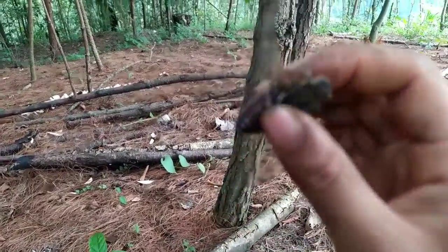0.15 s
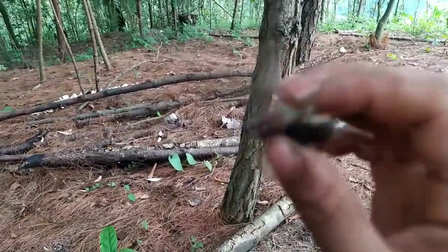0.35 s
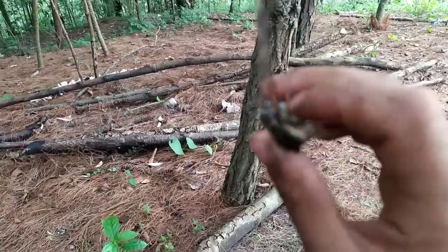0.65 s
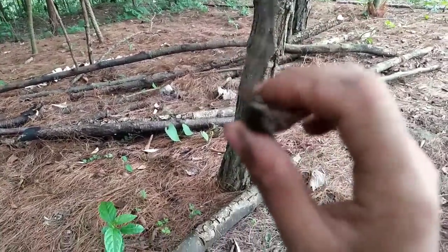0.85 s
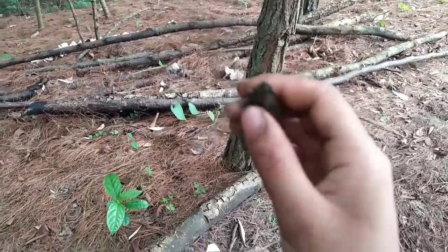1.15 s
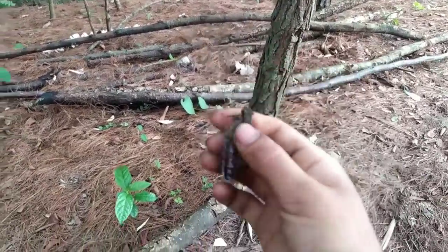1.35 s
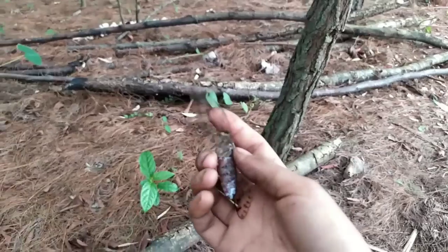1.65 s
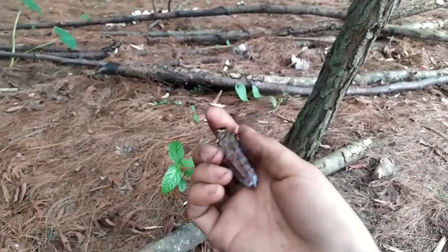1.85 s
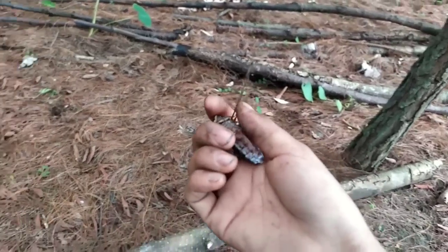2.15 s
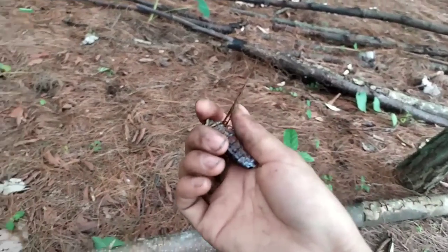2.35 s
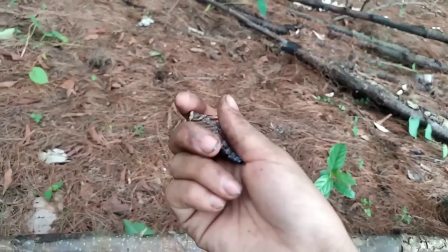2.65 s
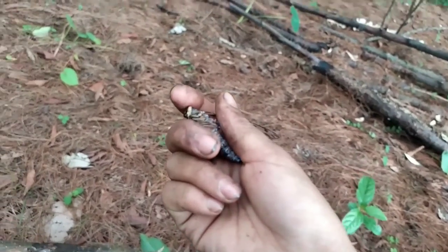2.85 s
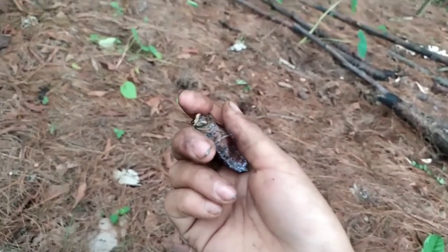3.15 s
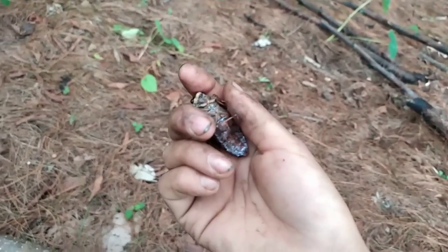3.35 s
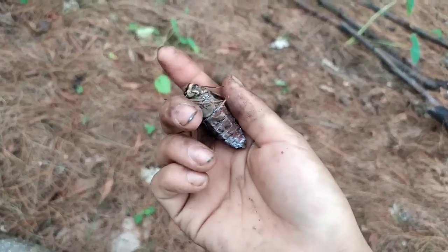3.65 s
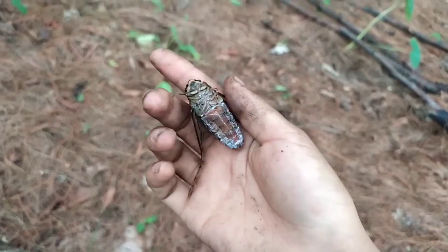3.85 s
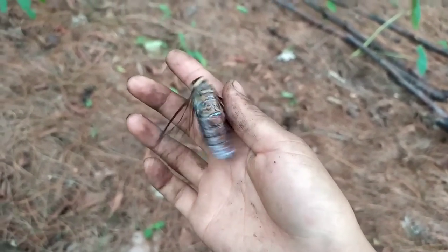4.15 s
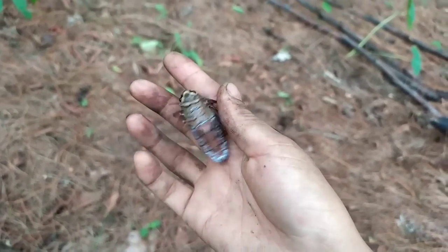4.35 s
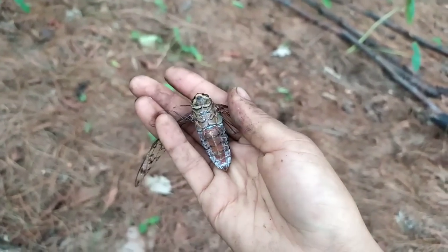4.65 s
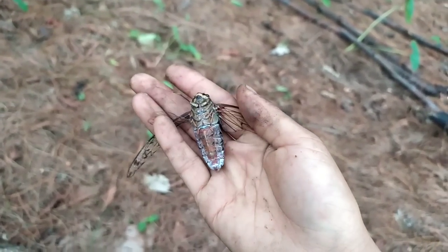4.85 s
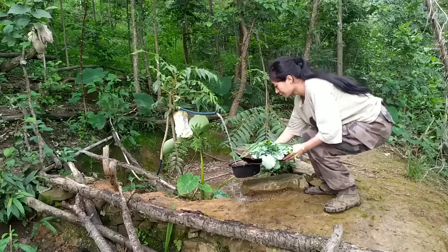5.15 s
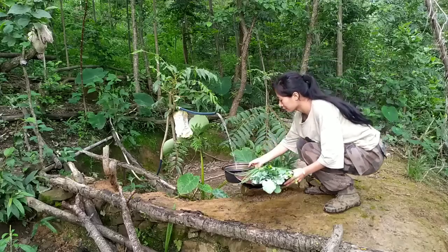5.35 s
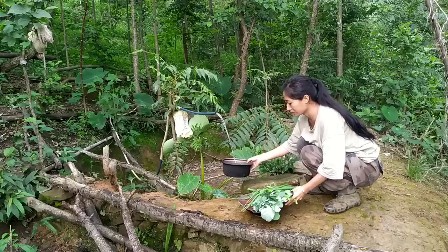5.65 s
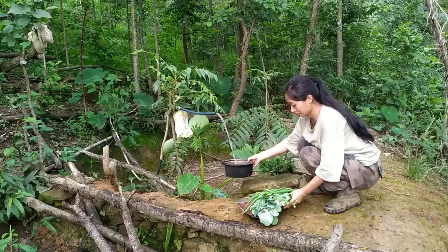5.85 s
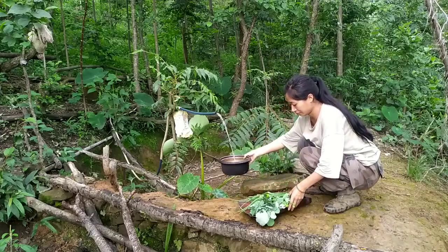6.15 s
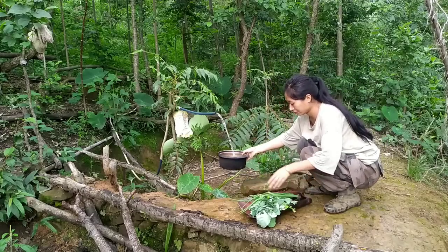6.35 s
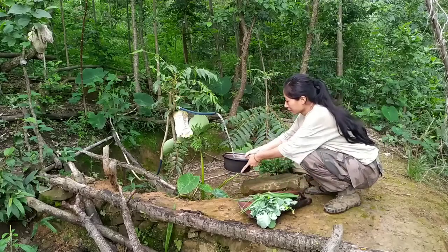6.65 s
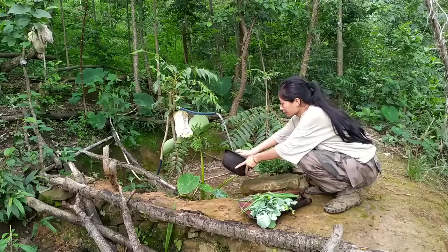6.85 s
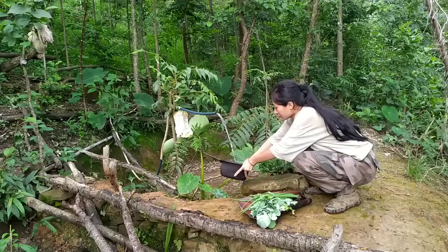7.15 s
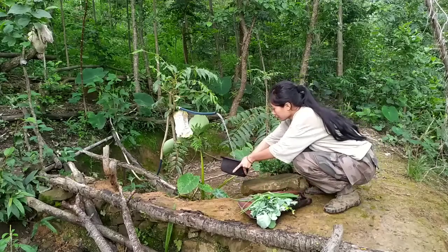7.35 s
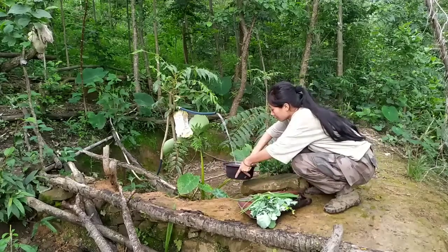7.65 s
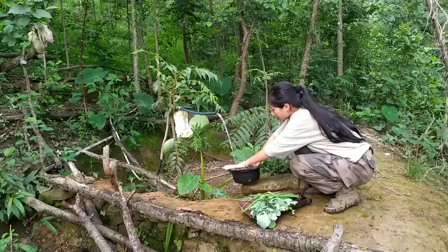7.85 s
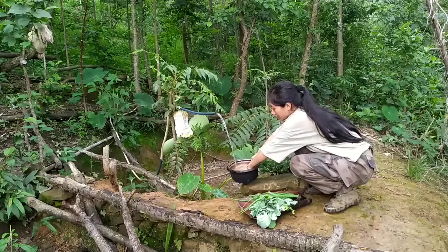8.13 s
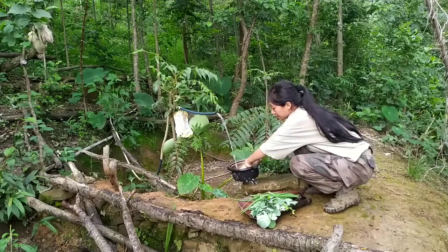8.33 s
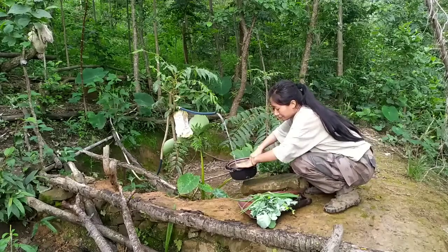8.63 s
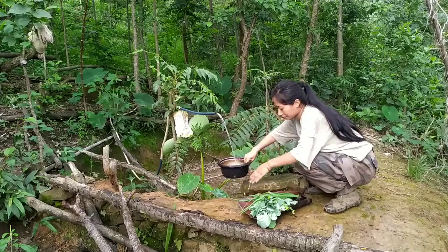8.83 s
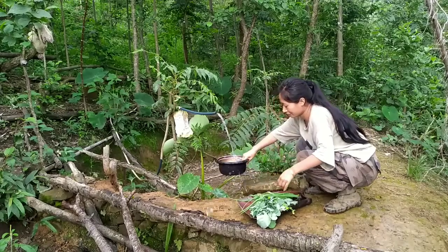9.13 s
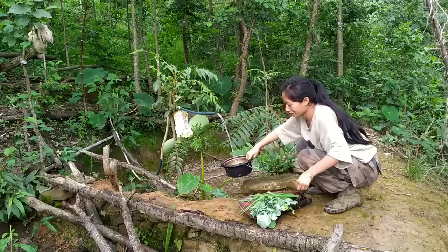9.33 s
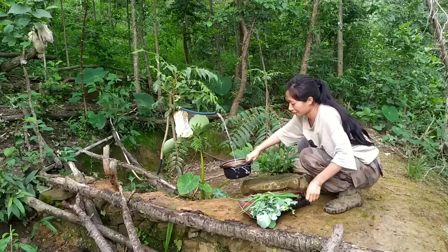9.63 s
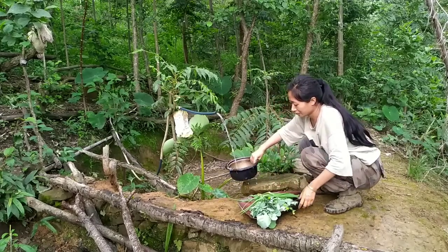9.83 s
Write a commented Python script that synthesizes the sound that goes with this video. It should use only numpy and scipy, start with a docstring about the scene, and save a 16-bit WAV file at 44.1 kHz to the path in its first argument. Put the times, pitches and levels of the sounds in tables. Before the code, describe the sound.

Very close to the microphone, a cicada held in fingers buzzes harshly, its rapid rattle swelling into piercing, ringing screams, faltering and changing tone as the grip shifts, with low wind bumps. A sudden cut brings a much quieter forest spring: thin water hiss, faint far cicadas, hollow metal pot knocks and small splashes as it is rinsed.

```python
"""Fingers close to a two-port microphone, then a forest spring: a held cicada screams while wind bumps the ports.
Its tymbals beat about 110 times a second: snaps, rib clicks and a ringing hollow abdomen share these beats.
In the screams the right port is overloaded: a dull thud and a sizzle near three times the ring's pitch.
At the spring, ribbed hiss makes distant cicadas; filtered noise, drops and bubbles make a thin stream;
noise bursts and dying sines make a metal pot being knocked and rinsed."""
import sys
import numpy as np
from scipy import signal
from scipy.fft import rfft, irfft
from scipy.io import wavfile
from scipy.ndimage import uniform_filter1d

SR = 44100
rng = np.random.default_rng(int(sys.argv[2]) if len(sys.argv) > 2 else 0)


def persist_wave(psi):
    """Save psi, clipped to +-1, as 16-bit WAV."""
    counts = np.round(np.clip(psi, -1, 1) * 32767).astype(np.int16)
    wavfile.write(sys.argv[1], SR, np.atleast_2d(counts).T)


N = 440559
T = np.arange(N) / SR
CUT_S = 5.345  # cicada before, spring after
EDGE_HZ = 15800  # band limit of the microphone
PORT_LAG_SAMPLES = 5  # the right port is nearer

# Tables. "rel." levels are scaled again where used.
# tymbal muscle: contraction rate, rms wander
BEAT_HZ, BEAT_WANDER_HZ = 110.1, 0.515
# faltering beats: t/s, half-length/s, slowing/Hz, weakening/dB
FALTERS = [(0.148, 0.025, 4, 1), (0.371, 0.031, 3, 0), (0.861, 0.022, 2, -0.5), (1.552, 0.039, 6.5, -1),
           (1.8, 0.034, 9.5, 0.5), (1.987, 0.028, 9.5, 0), (2.48, 0.044, 14, 2), (2.535, 0.013, -0.5, 2),
           (2.743, .012, 10, 9), (2.955, 0.059, 6.5, -1.5), (4.23, 0.041, 3.5, -0.5), (4.697, 0.053, 6, 0),
           (5.163, 0.047, -1, 2.5), (5.337, 0.11, 4, 7.5)]
# second tymbal, between the beats of the first: t/s, strength/0-1
SECOND_TYMBAL = [(.775, 0), (.795, 0.76), (.835, 0.21), (2.73, 0.03), (2.77, 0.57), (2.98, 0.4),
                 (3.07, 0.6), (3.09, 0.9), (3.3, 1), (3.58, 0.91), (3.815, 0.9), (3.825, 0)]
# strain of the insect: t/s, effort/dB
EFFORT = [(0, -17), (.18, -8.5), (.24, -1), (.55, -4.5), (.8, 1.5), (.88, -9), (1.08, -7.5), (1.62, -4.5),
          (1.87, 3), (2.14, 2.5), (2.3, -1.5), (2.98, -2.5), (3.1, 2), (3.48, 6), (3.81, 2.5), (3.85, -0.5),
          (4.0, -4), (4.35, -5.5), (4.98, 2), (5.33, 2)]
EFFORT_WAVER_DB = 0.76  # rms
# part levels at zero effort/dB, and slopes/dB per dB of effort
RING_DB, RING_SLOPE = -9.5, 0.21
PLATE_DB, PLATE_SLOPE = -21.5, 0.16
RIBS_DB, RIBS_SLOPE = -27, 1.23
GLIDE_SLOPE, THUD_SLOPE = 0.14, 0.75
# spectrum of the plate snap: f/Hz, rel. level/dB
PLATE_SPECTRUM = [(600, -18.5), (880, -18), (1060, -8), (1250, 6.5), (1520, 10), (1900, 12), (2300, 9),
                  (2700, 12.5), (2950, 9.5), (3250, -4.5), (4000, -12), (6000, -49.5)]
# bare snap under a shut abdomen: t/s, lowest f/Hz, level/dB, hold/0-1
SWOOPS = [(0, 1200, -41, 0.22), (.19, 1230, -26.5, 0.35), (.23, 2020, -31, 0), (.45, 1700, -26.5, 0),
          (.76, 1670, -30, 0.01), (.82, 1340, -21.5, 0.4), (.9, 1410, -24, 0.4), (1.0, 1220, -24.5, 0.05),
          (1.12, 1980, -48, 0.22), (2.1, 1680, -26, 0.17), (2.32, 1650, -41, 0.16), (2.35, 1550, -29, 0),
          (2.52, 1480, -34, 0), (2.58, 1550, -40, .05), (2.7, 1680, -31, 0.18), (2.76, 1267, -27, 0.33),
          (3.06, 1206, -28.5, 0.3), (3.09, 1389, -20, 0.37), (3.27, 1266, -21, 0.26),
          (3.48, 1620, -22, 0.1), (3.52, 1340, -21, 0.45), (3.6, 1520, -25, 0), (3.85, 1540, -31, 0)]
# spectrum of the rib rattle: f/Hz, rel. level/dB
RIB_SPECTRUM = [(1500, -58), (2400, 11.5), (2950, 7), (3300, 5), (3600, 10.5), (4300, 8), (4950, -9),
                (5400, 2), (6100, -9.5), (8500, -23.5)]
# spectrum of the fizz: f/Hz, rel. level/dB
FIZZ_SPECTRUM = [(2500, -8.5), (4500, 12), (5400, 6), (6100, 8), (6600, 8), (7100, 5.5), (7600, 9),
                 (8100, 6.5), (9000, 4), (11000, 0.5), (12500, -2), (15500, -6)]
# fizzing treble: t/s, rel. level/dB
FIZZ_LEVEL = [(0, -35), (.25, -33), (.8, -33.5), (1.02, -37), (1.2, -35), (1.72, -33.5), (2.05, -35.5),
              (2.45, -38.5), (2.78, -36), (3.1, -40.5), (3.5, -36.5), (3.8, -31), (4.2, -32.5),
              (5.05, -33.5), (5.33, -34.5)]
# rib sizzles as the grip shifts: start/s, end/s, first f/Hz, last f/Hz, level/dB
SIZZLES = [(.22, .9, 8200, 8370, -38.5), (1.15, 1.95, 8200, 9970, -39)]
# wind gusts on the ports: t/s, half-length/s, level/dB
GUSTS = [(.1, 0.26, -38), (.52, 0.16, -34.5), (.95, 0.21, -42.5), (1.56, 0.086, -38), (1.78, 0.05, -42),
         (2.08, 0.24, -45.5), (2.58, 0.17, -32), (2.97, 0.13, -39), (3.37, 0.15, -43), (3.68, 0.071, -30.5),
         (4.07, 0.19, -30.5), (4.33, 0.082, -35.5), (5.14, 0.035, -34)]
CALM_DB = -54  # wind between gusts
# spectrum of wind, also of the air at the spring: f/Hz, rel. level/dB
WIND_SPECTRUM = [(15, -11), (32, -13), (55, 2.5), (80, -0.5), (120, -6.5), (180, -15), (300, -29),
                 (600, -39), (2000, -29.5)]
# gliding resonances above the abdomen's ring, a pinched tymbal at first, an open body mode in the last scream:
# start/s, end/s, first f/Hz, last f/Hz, rel. level/dB, second mode re first/dB
GLIDING_RESONANCES = [(0.197, .36, 2500, 2570, -23, -17), (0.367, 0.565, 2700, 2560, -31.5, -1),
                      (0.587, 0.686, 2760, 2780, -25, 1), (0.707, 0.812, 2760, 2746, -22, -7),
                      (1.004, 1.153, 2760, 2750, -31, -24), (2.688, 2.748, 2500, 3250, -21, -17),
                      (2.997, 3.085, 3225, 2900, -22, -16), (3.085, 3.225, 2570, 2690, -20, -26),
                      (3.228, 3.412, 2780, 2890, -28.5, -24), (3.405, 3.57, 2730, 2640, -17, -14),
                      (3.557, 3.82, 2730, 2760, -24, -20), (3.83, 4.497, 2900, 2990, -30.5, -19),
                      (4.52, 5.29, 2985, 2920, -29.5, -7)]
# screams of the opening abdomen: start/s, end/s, attack/s, release/s, opening/0-1, rel. overload level/dB
SCREAMS = [(0.203, 0.904, .01, 0.47, 0.34, -67), (1.013, 2.331, 0.11, 0.004, 0.78, -44.5),
           (2.35, 2.53, 0.002, 0.022, 0.22, -62), (2.562, 2.69, 0.0017, 0.075, 0.75, -55),
           (3.552, 5.39, 0.0066, 0.013, 0.67, -39)]
# snaps that fail to ring the abdomen fully: start/s, end/s, weakening/dB
MISFIRES = [(1.644, 1.662, 6), (1.671, 1.699, 5.5), (1.708, 1.735, 6.5), (1.783, 1.812, 5),
            (1.822, 1.831, 4), (5.108, 5.19, 2)]
# abdominal cavity as it stretches: t/s, f/Hz, ring length/s
CAVITY = [(0, 2270, .0008), (.25, 2360, 0.0013), (.55, 2027, 0.00093), (1.05, 2380, 0.00073),
          (1.2, 2280, 0.0024), (1.48, 2282, 0.0029), (1.7, 2232, 0.0014), (2.0, 2320, 0.0036),
          (2.2, 2210, 0.0016), (2.32, 2220, 0.00095), (2.35, 2170, 0.00068), (2.54, 2060, 0.00076),
          (2.575, 2310, 0.0028), (2.61, 2090, 0.0019), (2.635, 2300, 0.0034), (2.67, 2070, 0.0017),
          (3.45, 2360, 0.00089), (3.58, 2224, 0.0021), (4.08, 2285, 0.004), (4.55, 2192, 0.0025),
          (4.95, 2214, 0.0027), (5.33, 2180, 0.0034)]
RING_JITTER_S = .000018  # rms
UPPER_RATIO, UPPER_DB = 1.605, -30  # second mode: pitch and level re the cavity
# spectrum of the overload thud: f/Hz, rel. level/dB
THUD_SPECTRUM = [(50, -13.5), (110, 0.5), (220, 2), (330, 1.5), (450, -1.5), (900, 0), (1300, -0.5),
                 (2000, -53), (4000, -109)]
# stronger overload as the open hand turns to the port: t/s, half-length/s, rise/dB
FACING = [(3.706, 0.15, 2.5), (4.792, 0.44, 6.5)]
OVERTONE_DB = 3  # overload sizzle re overload gain
SHRILL_HZ, SHRILL_DB = 7580, -6  # fixed metallic body resonance, level re overload gain
# ribs rasping against the grip: t/s, half-length/s, f/Hz, rel. level/dB
RASPS = [(.4, .1, 4050, -33), (1.88, .04, 4100, -31), (2.13, .04, 4000, -27), (2.655, .02, 3950, -29),
         (3.13, .07, 3500, -27), (3.245, .012, 3200, -21), (3.3, .011, 3050, -15.5),
         (3.348, .016, 3100, -17.5), (3.475, .014, 2850, -16), (3.68, .1, 3600, -28),
         (4.62, .08, 3500, -30)]
RASP_FLOOR_HZ = 2170  # the small ribs radiate little lower
# legs and wings scuffing the fingers: t/s, half-length/s, f/Hz, level/dB
SCUFFS = [(0.817, 0.0071, 3000, -31), (.955, 0.016, 3600, -31.5), (2.75, 0.014, 4000, -29.5),
          (2.784, .025, 4320, -30.5), (5.306, 0.0016, 4850, -20)]
# far cicadas: t/s, rel. low level/dB, rel. high level/dB
CHORUS = [(5.4, -54, -47.5), (7.2, -51.5, -45.5), (8.3, -50, -43.5), (9.1, -49, -42.5), (9.6, -48.5, -46),
          (9.98, -50, -47)]
# spectrum of the low chorus: f/Hz, rel. level/dB
LOW_CHORUS_SPECTRUM = [(800, -39), (1060, -29), (1230, -10.5), (1380, -4.5), (1650, -4.5), (1840, -11.5),
                       (2000, 5), (2150, -15), (2450, 1), (2900, 0.5), (3150, -5), (3400, -5.5), (3600, -9),
                       (5000, -45)]
# spectrum of the high chorus: f/Hz, rel. level/dB
HIGH_CHORUS_SPECTRUM = [(2800, -40), (3550, -12), (3780, 5), (4000, 8.5), (4450, 1), (4800, 5.5), (5050, 2),
                        (5450, 7.5), (6000, 0.5), (6900, 1.5), (7600, -7.5), (10000, -27)]
# voices that stand out: f/Hz, rel. level/dB
SINGERS = [(1152, -72.5), (1384, -62.5), (1497, -72), (1610, -66), (1841, -65), (2080, -65.5),
           (2245, -68.5), (2315, -62), (2536, -59.5), (2762, -63), (4150, -69), (4253, -58), (4377, -59.5),
           (4470, -61), (5335, -64), (5626, -67.5), (5850, -64)]
# chirps in a slowing series, a rest, a restart: t/s, swell/dB
CHIRPS = [(7.775, 5.5), (7.9, 7), (8.025, 8), (8.17, 5), (8.3, 6.5), (8.46, 9.5), (8.61, 5.5), (8.77, 6.5),
          (8.91, 5.5), (9.075, 7), (9.855, 9), (9.98, 9)]
CHIRP_HALF_S = .035
# spectrum of the stream: f/Hz, rel. level/dB
STREAM_SPECTRUM = [(20, -3), (50, -4), (90, -7), (180, 5.5), (300, -4.5), (600, -3), (1000, -3), (2500, 14),
                   (3400, -13), (5000, 9), (7500, 2.5), (10000, 0), (13000, -8), (15500, -13)]
# stream flow: t/s, rel. level/dB
FLOW = [(5.4, -60.5), (6.9, -59.5), (8.3, -54.5), (9.3, -54.5), (9.98, -59)]
# water swirling in the pot: t/s, half-length/s, rel. level/dB
SLOSHES = [(7.12, 0.17, -62), (7.55, 0.23, -66), (8.2, .25, -68), (8.68, 0.12, -69), (9.55, 0.14, -79),
           (9.97, 0.16, -67)]
TRICKLE_DB = -75.5  # gurgle between swirls, rel.
# knocks and splashes: t/s, dull body rel. level/dB, bright splash rel. level/dB, pot ring rel. level/dB
KNOCKS = [(5.477, -40, -56, -48.5), (5.559, -31.5, -27, -46), (5.991, -41, -58, -56),
          (6.113, -25.5, -41, -57), (6.248, -35, -60, -63), (6.559, -48, -42, -78), (6.82, -45, -57, -68),
          (7.203, -37, -55, -70), (7.689, -37, -52, -61), (8.084, -34, -55, -70),
          (8.187, -29.5, -16.5, -64), (8.195, -44, -37, -72), (8.217, -52, -39, -75),
          (8.246, -37, -38, -74), (8.369, -26, -23, -65), (8.461, -32, -25.5, -70), (8.658, -39, -50, -72),
          (8.847, -38, -35, -72), (9.166, -42, -46, -59), (9.435, -39, -39, -72), (9.52, -40, -55, -72),
          (9.712, -39, -39, -77), (9.762, -60, -43, -70)]
# modes of the ringing pot: f/Hz, rel. level/dB, t60/s
POT_MODES = [(398, -3.5, 0.31), (910, -9, 0.53), (1500, -4, 0.22)]
# modes of the water-damped pot, retuned at each knock: nominal f/Hz, rel. level/dB, t60/s
KNOCK_MODES = [(512, -5.5, 0.061), (750, -10, 0.079), (1080, -3, 0.056), (1980, -22, 0.033)]
# spectrum of the dull body: f/Hz, rel. level/dB
BODY_SPECTRUM = [(80, -4), (200, -5.5), (400, -8), (700, -1), (1150, -6.5), (1800, 2.5), (3500, -39),
                 (8000, -33)]
# spectrum of the splash: f/Hz, rel. level/dB
SPLASH_SPECTRUM = [(600, -59), (1800, -8), (3500, 0.5), (5500, -6.5), (7600, 2.5), (9000, -0.5),
                   (11000, -8.5), (15500, -14)]


def amp(db):
    """Decibels to gain."""
    return 10 ** (np.asarray(db) / 20)


def evened(x):
    """Scales to rms 1."""
    return x / np.sqrt(np.mean(x ** 2) + 1e-20)


def curves(rows):
    """Columns of a table, joined by straight lines in time."""
    s, *columns = np.transpose(rows)
    return [np.interp(T, s, column) for column in columns]


def drift(hz, at=T, size=256):
    """Slow noise of rms 1 below hz, read at the given times."""
    grid = T[::size]
    spectrum = rfft(rng.standard_normal(len(grid)))
    passed = np.fft.rfftfreq(len(grid), size / SR) < hz
    return np.interp(at, grid, evened(irfft(spectrum * passed, len(grid))))


def colour(x, points, size=2048):
    """Causal minimum-phase filter with the given spectrum: steep edges ring on after a click."""
    hz, db = np.transpose(points)
    bins_hz = abs(np.fft.fftfreq(size, 1 / SR)) + 1
    log_gain = np.log(amp(np.interp(np.log(bins_hz), np.log(hz), db)))
    taps = np.fft.ifft(np.exp(np.conj(signal.hilbert(log_gain)))).real
    return signal.oaconvolve(np.atleast_2d(x), taps[None], axes=1)[:, :N]


def steady(x, size=1600):
    """Holds the rms of the ports' mean near 1 over a few pulses."""
    power = np.atleast_2d(x).mean(0) ** 2
    power = uniform_filter1d(uniform_filter1d(power, size), size)
    return x / np.sqrt(abs(power) + 1e-14)


def noise(same):
    """White noise at both ports, with a share of power in common."""
    same = np.clip(same, 0, 1)
    return np.sqrt(same) * rng.standard_normal(N) + np.sqrt(1 - same) * rng.standard_normal((2, N))


def clicks(times, sizes, order=8):
    """One windowed sinc at each exact time."""
    at = np.floor(times * SR).astype(int)[:, None] + np.arange(1 - order, order + 1)
    off = at - times[:, None] * SR
    shape = sizes[:, None] * np.sinc(off) * np.cos(np.pi * off / (2 * order)) ** 2
    return np.bincount(np.clip(at, 0, N - 1).ravel(), shape.ravel(), N)


def ports(right_db):
    """Left and right gains with mean 1, right_db apart."""
    gains = np.array([[1], [amp(right_db)]])
    return gains / gains.mean()


def flicker(x, depth_db, size=1024, count=9, order=4):
    """Spectral patches, count frames long and order bins wide, swell and fade on their own."""
    z = signal.stft(x, nperseg=size)[2]
    patches = uniform_filter1d(rng.standard_normal(z.shape[1:]), count, 1)
    patches = evened(uniform_filter1d(patches, order, 0))
    return signal.istft(z * amp(depth_db * patches), nperseg=size)[1][:, :N]


def band(x, hz, width_hz):
    """Steep resonance following the curve hz, held near rms 1: shifted to 0 Hz, smoothed, shifted back."""
    turn = np.exp(2j * np.pi * np.cumsum(hz) / SR)
    r = np.exp(-np.pi * width_hz / SR)
    smooth = signal.lfilter([(1 - r) ** 2], [1, -2 * r, r ** 2], x * turn.conj() + 1e-18)
    return steady((turn * smooth).real)


def bumps(times, half_lengths, heights, size=64):
    """A sum of bell-shaped swells."""
    grid = T[::size]
    bells = np.exp(-np.minimum(((grid[:, None] - times) / half_lengths) ** 2, 50))
    return np.interp(T, grid, bells @ heights)


def surges(rows, rest_db):
    """Gain of swells (t/s, half-length/s, level/dB) over a resting level, summed as power."""
    s, half_s, db = np.transpose(rows)
    return np.sqrt(bumps(s, half_s, amp(db) ** 2) + amp(rest_db) ** 2)


def gate(start, end, attack_s, release_s, size=16):
    """Exponential attack, hold and release, within 0 to 1."""
    grid = T[::size]
    attack = np.expm1(-np.maximum(grid - start, 0) / attack_s)
    release = np.expm1(-np.maximum(end - grid, 0) / release_s)
    return np.interp(T, grid, attack * release)


def across(starts, ends, first, last):
    """A value that runs from first to last during each event."""
    return np.interp(T, np.ravel([starts, ends], "F"), np.ravel([first, last], "F"))


def glides(rows, fade_s=0.0097):
    """Pitch and gain of gliding resonances."""
    gain = sum(amp(db) * gate(start, end, fade_s, fade_s) for start, end, _, _, db, *_ in rows)
    return across(*np.transpose(rows)[:4]), gain


def each_snap(times, size=600):
    """Sample places after each snap, and the time since it."""
    at = np.ceil(times * SR).astype(int)[:, None] + np.arange(size)
    return at, at / SR - times[:, None]


def cicada():
    """All tymbal-driven parts on one set of beats; one effort curve scales most of them."""
    times, sizes = tymbal_beats()
    effort_db = curves(EFFORT)[0] + EFFORT_WAVER_DB * drift(18)
    snaps = evened(clicks(times, sizes))
    ribs = evened(rib_clicks(times, sizes))
    burst = abs(signal.lfilter([1], [1, -np.exp(-1 / (0.0058 * SR))], snaps))
    scrape = evened(noise(0.11) * np.roll(burst, 30))
    # each port hears another side of the body
    sides = evened(np.array([rib_clicks(times, sizes), rib_clicks(times, sizes)]))
    crackle = .9 * ribs + sides + .4 * scrape

    opening, overload = screams(effort_db)
    cavity = steady(abdomen(times, sizes))
    body = plate_snap(snaps + .55 * ribs + .45 * scrape, effort_db)
    body = body + swoops(times, sizes) * ports(8.8)
    body = body + gliding_resonances(snaps, ribs, scrape, effort_db)
    body = body + abdomen_ring(cavity, snaps + 0.61 * ribs, opening, effort_db)
    body = body + overload_thud(snaps + 0.027 * scrape, overload)
    left, right = body + rasps(snaps + 0.65 * ribs + 0.72 * scrape)
    lagged = np.array([np.roll(left, PORT_LAG_SAMPLES), right])

    treble = rib_treble(crackle, scrape, effort_db) + shrill(crackle, overload)
    s, half_s, _, weaker_db = np.transpose(FALTERS)
    whole = lagged + treble + overload_sizzle(cavity, scrape, overload)
    return whole * amp(-bumps(s, half_s, weaker_db))


def tymbal_beats(uneven_db=1.2, jitter_s=.00002, stagger_s=0.00013):
    """Snap times and strengths; the two tymbals take turns, never quite evenly."""
    s, half_s, slower_hz, _ = np.transpose(FALTERS)
    rate_hz = BEAT_HZ - bumps(s, half_s, slower_hz) + BEAT_WANDER_HZ * drift(25)
    half_turns = 2 * np.cumsum(rate_hz) / SR
    k = np.arange(1, int(np.interp(CUT_S, T, half_turns)))
    late, strong = rng.standard_normal((2, len(k)))
    times = np.interp(k, half_turns, T) + jitter_s * late
    times = times + (k % 2) * stagger_s * drift(11.08, times)  # the second drifts off the half beat
    sizes = np.where(k % 2, np.interp(times, T, curves(SECOND_TYMBAL)[0]), 1)
    return times, sizes * amp(uneven_db * strong)


def rib_clicks(times, sizes, gap_s=.00052, fall_db=1.15, count=6):
    """Ribs buckle one after another behind each snap, alternating in sign; their spacing wanders."""
    out = np.zeros(N)
    for k in range(count):
        wander = .15 * drift(2.5, times) + .016 * rng.standard_normal(len(times))
        out += (-1) ** k * clicks(times + gap_s * (k + 1 + wander), sizes * amp(-fall_db * k))
    return out


def plate_snap(buckle, effort_db):
    """Buckling rings the tymbal plate's spectrum; a long bare swoop takes over from it."""
    bare = np.clip(curves(SWOOPS)[2], 0, 1)
    plate = steady(colour(buckle, PLATE_SPECTRUM)) * ports(8.8)
    return plate * (1 - bare) ** 2 * amp(PLATE_DB + PLATE_SLOPE * effort_db)


def swoops(times, sizes, above_hz=2000, drop_s=.0005, back_hz=1900, back_s=.0004,
           stroke_s=.0033, rise_s=.0003, fade_s=.0011, octave_db=-14):
    """The tymbal's tone falls as it buckles, rests low, and climbs as it springs back."""
    low_hz, db, hold = curves(SWOOPS)
    low_hz = np.interp(times, T, low_hz + 25 * drift(7.4))[:, None]
    hold = np.interp(times, T, hold)[:, None]
    at, age = each_snap(times)
    age = np.minimum(age, 1.3 * stroke_s)
    fall = -above_hz * drop_s * np.expm1(-age / drop_s)
    climb = back_hz * back_s * np.exp((age - stroke_s) / back_s)
    turns = low_hz * age + fall + climb
    shape = -np.expm1(-(age / rise_s) ** 2) * (np.exp(-age / fade_s) + hold)
    shape = shape * np.exp(-(age / stroke_s) ** 10)
    tone = np.sin(2 * np.pi * turns) + amp(octave_db) * np.sin(4 * np.pi * turns)
    return steady(np.bincount(at.ravel(), (sizes[:, None] * shape * tone).ravel(), N)) * amp(db)


def rib_treble(crackle, scrape, effort_db):
    """Rib clicks and scrape excite a rattle, gliding sizzles and a flickering fizz."""
    rattle = steady(colour(crackle, RIB_SPECTRUM)) * amp(RIBS_DB + RIBS_SLOPE * effort_db) * ports(1.36)
    fizz = steady(colour(crackle + 3.8 * scrape, FIZZ_SPECTRUM))
    fizz = fizz * amp(curves(FIZZ_LEVEL)[0] + 1.23) * ports(0.57)
    sizzle_hz, sizzle_gain = glides(SIZZLES)
    sizzle = band(crackle, sizzle_hz, 2000) * sizzle_gain
    return rattle + sizzle + flicker(fizz, 2.2)


def wind():
    """Turbulence at the ports: lumpy rumble, mostly unrelated between them."""
    rumble = colour(noise(0.2), WIND_SPECTRUM, size=8192) * amp(2.1 * drift(5.4))
    return evened(rumble) * surges(GUSTS, CALM_DB) * ports(-0.027)


def trees(x, t60=0.66, size=16000):
    """Sparse, decaying random echoes: scatter from the ground and the trunks."""
    sparse = rng.standard_normal((2, size)) * (rng.random((2, size)) < .05)
    tail = sparse * amp(-60 * T[:size] / t60)
    return signal.oaconvolve(x, tail / np.linalg.norm(tail[0]), axes=1)[:, :N]


def gliding_resonances(snaps, ribs, scrape, effort_db):
    """Two gliding modes above the abdomen's ring: a pinched tymbal at first, an open body mode in the last scream."""
    glide_hz, glide_gain = glides(GLIDING_RESONANCES)
    starts, ends, *_, mode_db = np.transpose(GLIDING_RESONANCES)
    first = band(snaps + 0.085 * ribs + 0.32 * scrape, glide_hz, 210) * ports(10.4)
    second = band(snaps + 0.39 * ribs + 2.3 * scrape, 1.55 * glide_hz, 410)
    second = second * amp(across(starts, ends, mode_db, mode_db))
    return (first + second) * glide_gain * amp(GLIDE_SLOPE * effort_db)


def screams(effort_db):
    """Abdomen opening and overload gain; misfires weaken the overload twice as much in dB."""
    *_, opening, thud_db = np.transpose(SCREAMS)
    gates = np.array([gate(*row[:4]) for row in SCREAMS])
    misfire = amp(-sum(db * gate(start, end, .001, .001) for start, end, db in MISFIRES))
    overload = (amp(thud_db) @ gates) * misfire ** 2
    overload = overload * amp(THUD_SLOPE * effort_db + bumps(*np.transpose(FACING)))
    return (opening @ gates) * misfire, overload


def abdomen(times, sizes, rise_s=0.001, damping=1.88, rebound=0.1, rebound_s=0.00515, rebound_width_s=0.00029):
    """Each snap swells in the air cavity and is damped; the tymbal's return gives a small second push."""
    times = times + RING_JITTER_S * rng.standard_normal(len(times))  # it catches early or late
    # the struggling insect flexes its abdomen: pitch and length wobble
    cavity_hz, ring_s = curves(CAVITY)
    hz = np.interp(times, T, cavity_hz + 20 * drift(22))[:, None]
    length_s = np.interp(times, T, ring_s * np.exp(.08 * drift(35)))[:, None]
    at, age = each_snap(times)
    shape = -np.expm1(-(age / rise_s) ** 2) * np.exp(-(age / length_s) ** damping)
    shape = shape / shape.max(1, keepdims=True)
    shape = shape + rebound * np.exp(-((age - rebound_s) / rebound_width_s) ** 2)
    turns = hz * age * (1 + 0.0076 * (1 - age / length_s / 2))  # the tone sags as the tymbal relaxes
    return np.bincount(at.ravel(), (sizes[:, None] * shape * np.sin(2 * np.pi * turns)).ravel(), N)


def abdomen_ring(cavity, drive, opening, effort_db):
    """The cavity and its second mode radiate as the abdomen opens."""
    upper = band(drive, UPPER_RATIO * curves(CAVITY)[0], 220) * amp(UPPER_DB)
    return (cavity + upper) * opening * amp(RING_DB + RING_SLOPE * effort_db) * ports(9.0)


def overload_thud(drive, overload):
    """Pulses overload the right port: a dull thud 40 samples behind each snap."""
    return steady(colour(np.roll(drive, 40), THUD_SPECTRUM)) * overload * ports(54)


def overload_sizzle(cavity, scrape, overload):
    """Cubing the ring distorts it into a sizzle near three times its pitch."""
    sizzle = band(cavity ** 3 * (1 + 0.29 * scrape), 2.87 * curves(CAVITY)[0], 990)
    return sizzle * overload * amp(OVERTONE_DB) * ports(31.0)


def shrill(crackle, overload):
    """A fixed metallic body resonance that follows the overload gain."""
    return band(crackle, np.full(N, SHRILL_HZ), 460) * overload * amp(SHRILL_DB)


def rasps(drive, width_hz=1200):
    """Ribs catch and grate for a few beats, in a broad band above the ring."""
    s, half_s, hz, db = np.transpose(RASPS)
    floor = signal.butter(4, RASP_FLOOR_HZ, "high", fs=SR, output="sos")
    grate = band(signal.sosfilt(floor, drive), np.interp(T, s, hz) + 70 * drift(25), width_hz)
    return grate * surges(np.transpose([s, half_s, db]), -90) * ports(10.5)


def scuffs(grains_per_s=1500, width_hz=2600):
    """Legs and wings scuff the fingers: short rubs of grainy noise in a resonance."""
    s, half_s, hz, db = np.transpose(SCUFFS)
    grit = noise(0.37) * (0.29 + 4 * (rng.random(N) < grains_per_s / SR))
    return band(grit, np.interp(T, s, hz), width_hz) * surges(np.transpose([s, half_s, db]), -90)


def chorus():
    """Far cicadas blur into two bands of ribbed hiss; narrow-band singers stand out, the high ones chirping."""
    low_db, high_db = curves(CHORUS)
    s, swell_db = np.transpose(CHIRPS)
    chirp_db = bumps(s, CHIRP_HALF_S, swell_db)
    low = evened(colour(noise(0.13), LOW_CHORUS_SPECTRUM)) * amp(low_db + 3.0)
    high = evened(colour(noise(0.011), HIGH_CHORUS_SPECTRUM)) * amp(high_db + 0.51 * chirp_db)
    hz = np.fft.rfftfreq(N, 1 / SR)
    power = sum(amp(db) ** 2 / (1 + ((hz - f) / 20) ** 2) ** 2 for f, db in SINGERS)
    voices = rfft(noise(0.15)) * np.sqrt(power)
    low_singers = evened(irfft(voices * (hz < 3300), N)) * amp(low_db + 5.0)
    high_singers = steady(irfft(voices * (hz > 3300), N)) * amp(high_db + chirp_db - 6.5)
    ribbed = flicker(low + high + low_singers + high_singers, 2.6, size=2048, count=44, order=3)
    return flicker(ribbed, 1.3)


def water(drops_per_s=260, bubbles_per_s=90, count=14):
    """A thin stream hisses and spatters; short rising bubbles blend to a gurgle as the pot is swirled."""
    drop_sizes = amp(4.2 * np.minimum(rng.exponential(1, (2, N)), 4))
    drops = (rng.random((2, N)) < drops_per_s / SR) * drop_sizes
    stream = evened(colour(noise(0.3) + 0.53 * evened(drops), STREAM_SPECTRUM))
    stream = stream * amp(curves(FLOW)[0] + 8.0)
    bubbles, t = np.zeros(N), T[:1500]
    for hz in np.geomspace(480, 1000, count):
        bubble = np.sin(2 * np.pi * hz * t * (1 + 1.7 * t)) * np.exp(-t * hz / 2.9)
        births = (rng.random(N) < bubbles_per_s / count / SR) * rng.uniform(0.27, 1, N)
        bubbles += signal.oaconvolve(births, bubble)[:N]
    air = evened(colour(noise(1.0), WIND_SPECTRUM, size=8192)) * amp(-63.0)
    return stream + air + evened(bubbles) * surges(SLOSHES, TRICKLE_DB)


def add(mix, s, sound):
    """Adds a sound at time s."""
    part = mix[round(s * SR):][:len(sound)]
    part += sound[:len(part)]


def modes(table, pitch, t):
    """Dying sines."""
    return sum(amp(db - 60 * t / t60) * np.sin(2 * np.pi * hz * pitch * t) for hz, db, t60 in table)


def pot(body_t60=0.063, splash_t60=0.035, spray_db=-19, spray_t60=0.26, detune=0.13):
    """Each knock or slap has a dull, hollow body, a bright splash with spray, and ringing metal."""
    dull, bright, ring, t = np.zeros(N), np.zeros(N), np.zeros(N), T[:SR // 2]
    fills = rng.uniform(-0.99, 1, len(KNOCKS))  # retunes the damped modes
    for (s, body_db, splash_db, ring_db), fill in zip(KNOCKS, fills):
        add(dull, s, amp(body_db - 60 * t / body_t60))
        splash = amp(-60 * t / splash_t60) + amp(spray_db - 60 * t / spray_t60)
        add(bright, s, amp(splash_db) * splash)
        add(ring, s, amp(ring_db) * modes(POT_MODES, 1.0, t))
        add(ring, s, amp(body_db - 15.5) * modes(KNOCK_MODES, 1 + detune * fill, t))
    thump = colour(noise(0.9) * dull, BODY_SPECTRUM)
    return thump + colour(noise(0.24) * bright, SPLASH_SPECTRUM) * amp(1.5) + ring


def scene():
    """The held cicada, then the spring."""
    insect = cicada() + scuffs()
    held = insect + amp(-20) * trees(insect) + wind()
    knocks = pot()
    spring = (chorus() + water() + knocks + amp(-8.0) * trees(knocks)) * ports(-1.4)
    return np.where(T < CUT_S, held, spring)


def record(dry, ceiling=1.0, hardness=2.46):
    """The microphone rounds off the tallest pulses; then the band limit."""
    rounded = dry / (1 + abs(dry / ceiling) ** hardness) ** (1 / hardness)
    lowpass = signal.firwin(511, EDGE_HZ, window=("kaiser", 9), fs=SR)
    return signal.oaconvolve(rounded, lowpass[None], "same")


dry = scene()
out = record(dry)
persist_wave(out)
```